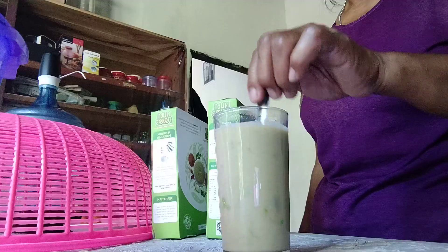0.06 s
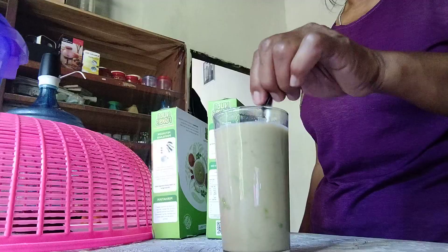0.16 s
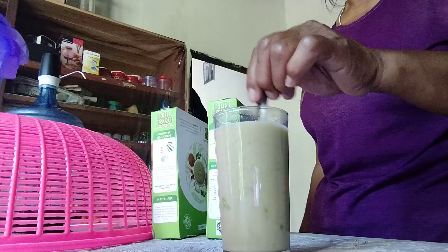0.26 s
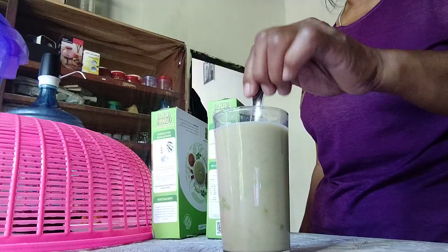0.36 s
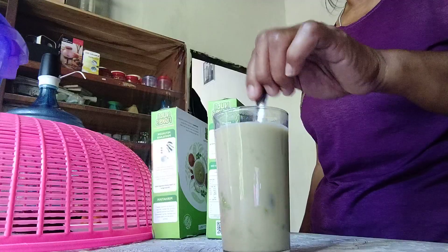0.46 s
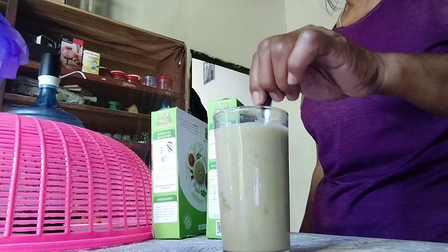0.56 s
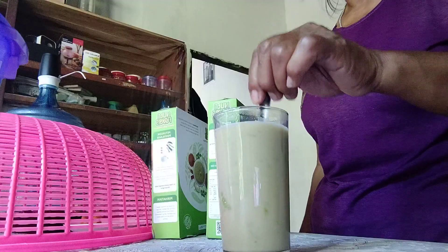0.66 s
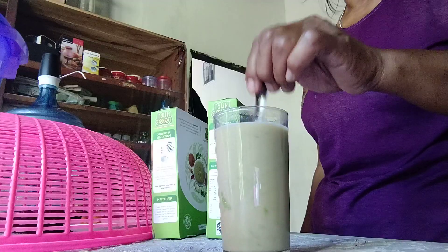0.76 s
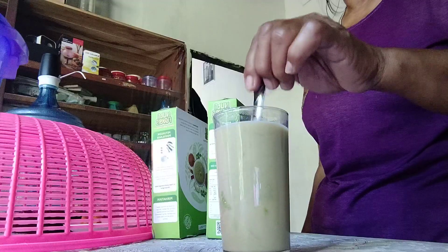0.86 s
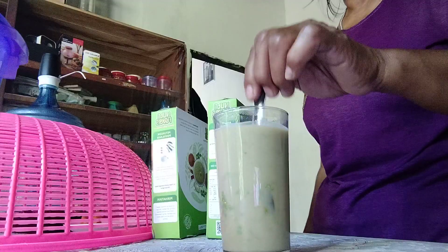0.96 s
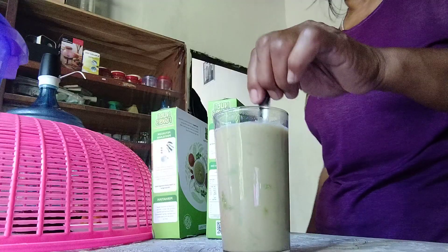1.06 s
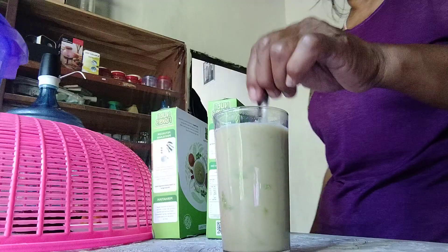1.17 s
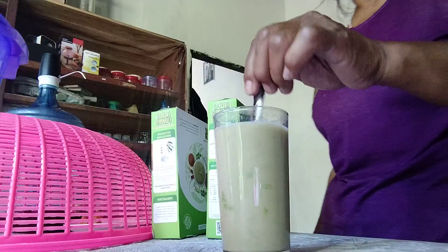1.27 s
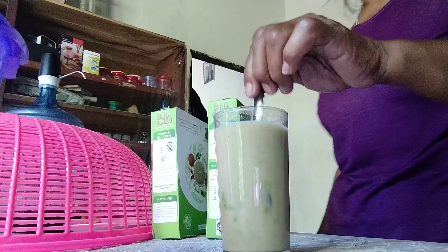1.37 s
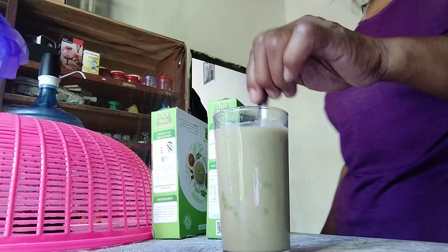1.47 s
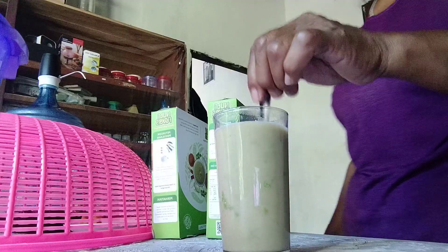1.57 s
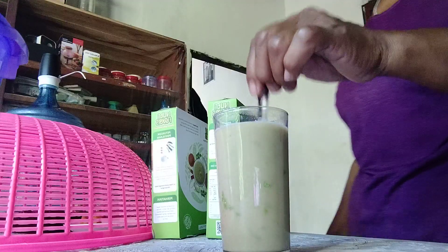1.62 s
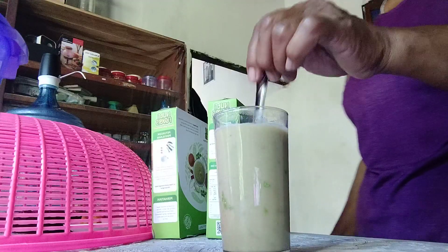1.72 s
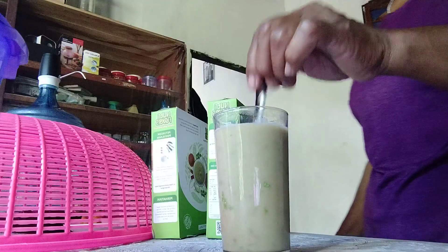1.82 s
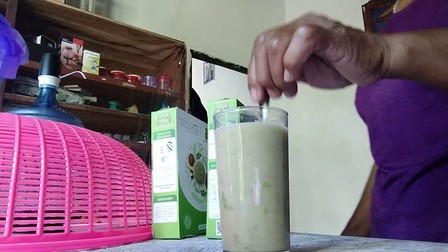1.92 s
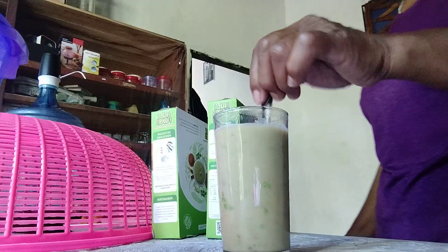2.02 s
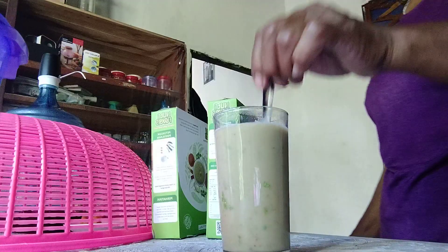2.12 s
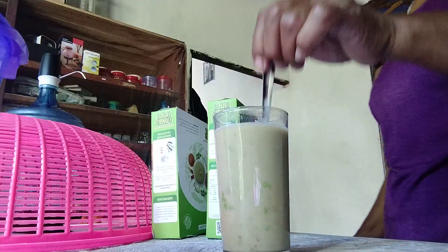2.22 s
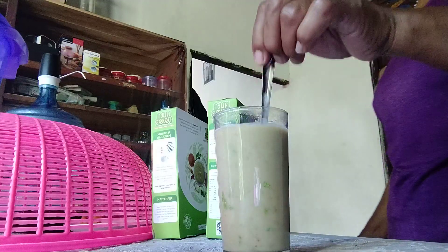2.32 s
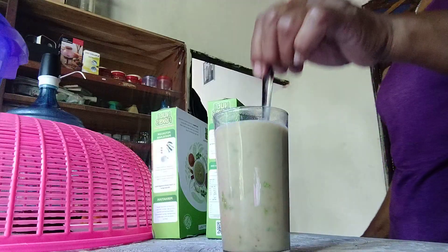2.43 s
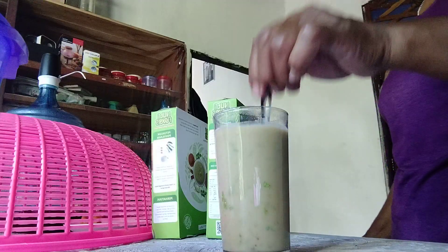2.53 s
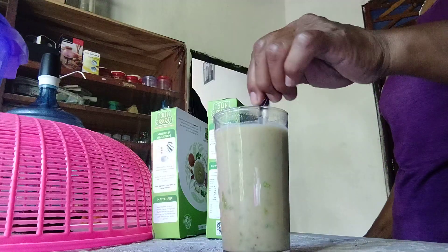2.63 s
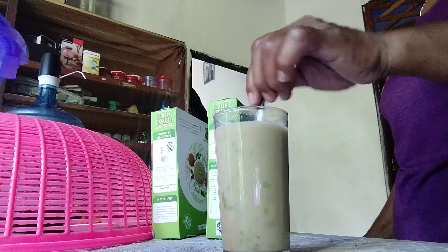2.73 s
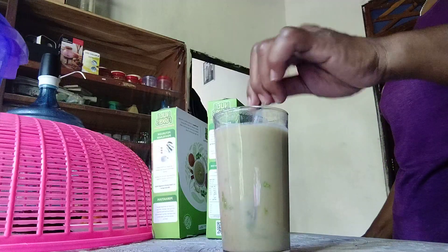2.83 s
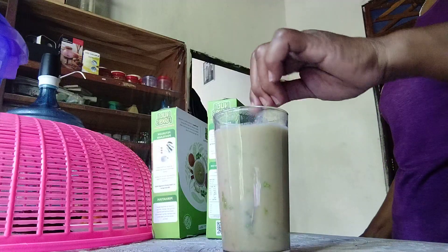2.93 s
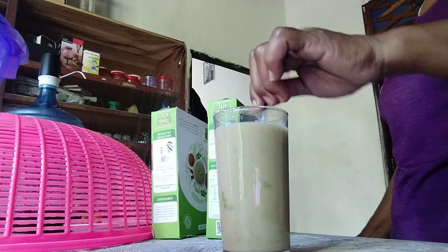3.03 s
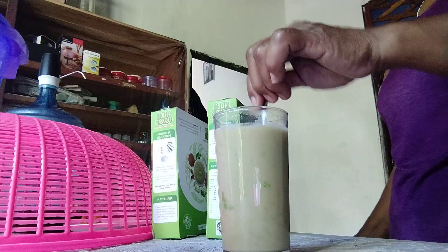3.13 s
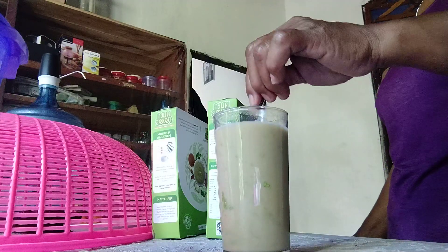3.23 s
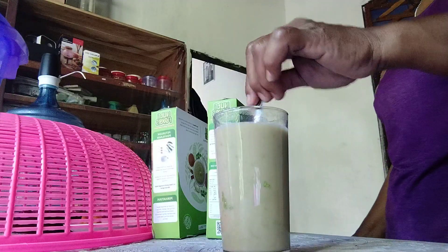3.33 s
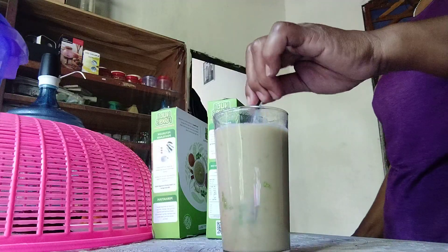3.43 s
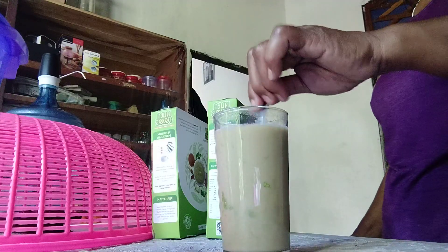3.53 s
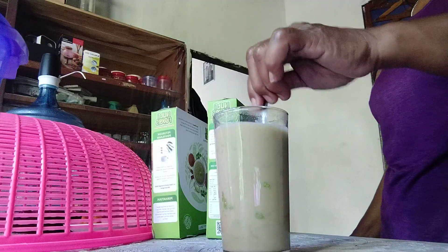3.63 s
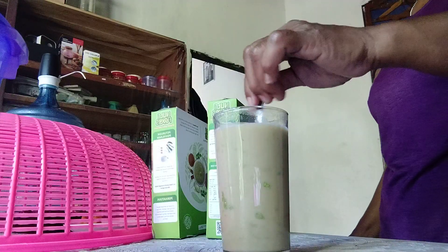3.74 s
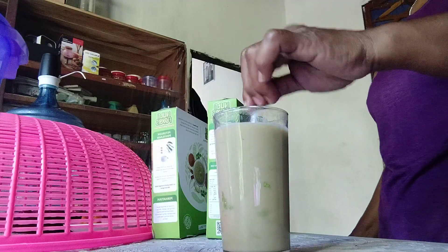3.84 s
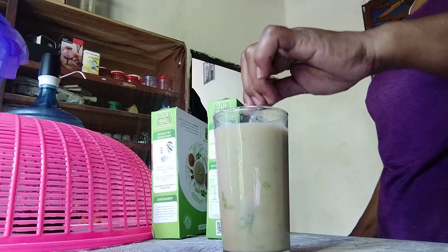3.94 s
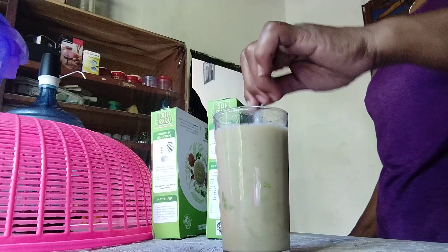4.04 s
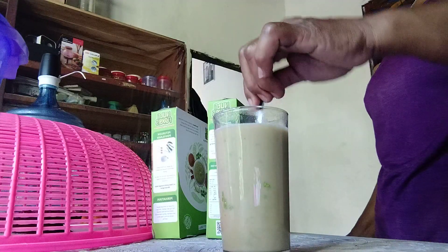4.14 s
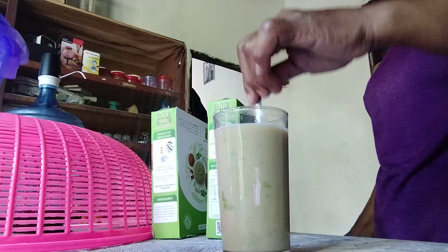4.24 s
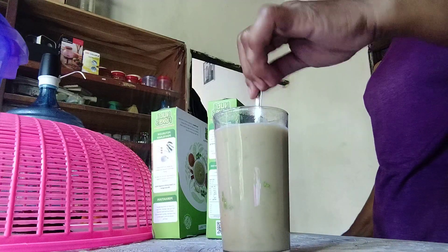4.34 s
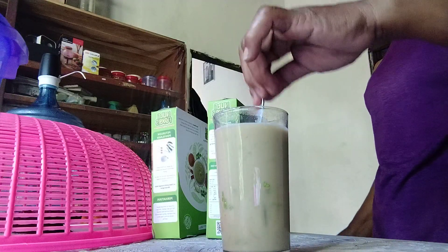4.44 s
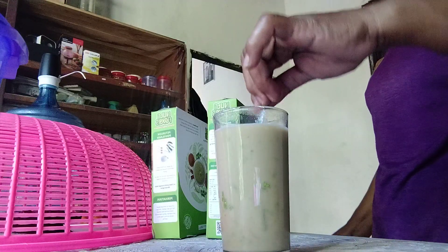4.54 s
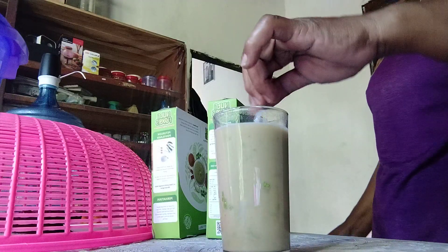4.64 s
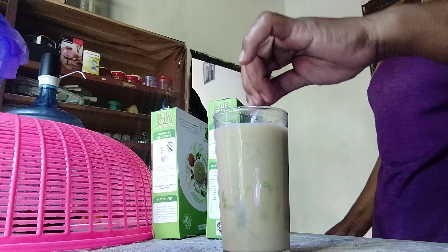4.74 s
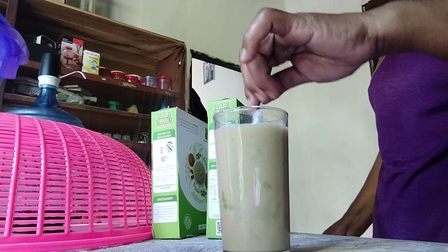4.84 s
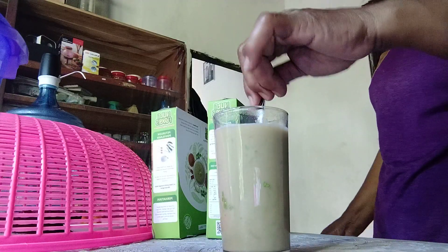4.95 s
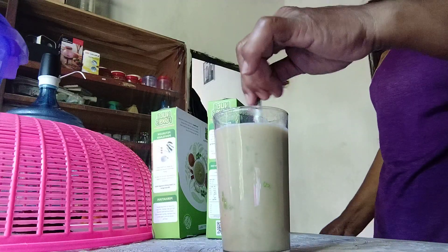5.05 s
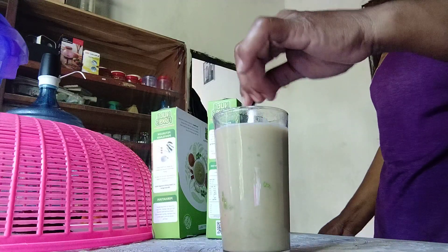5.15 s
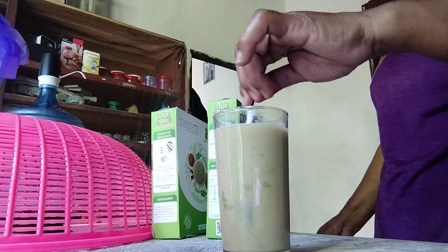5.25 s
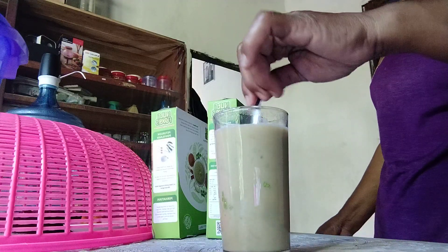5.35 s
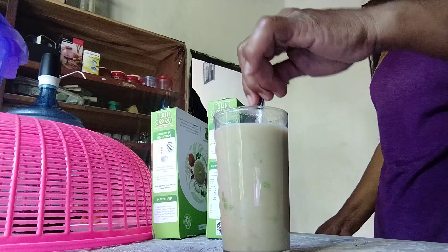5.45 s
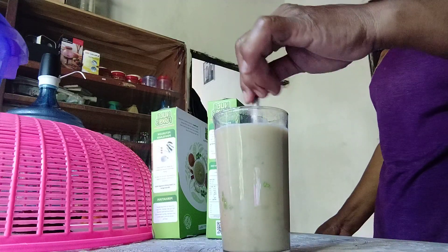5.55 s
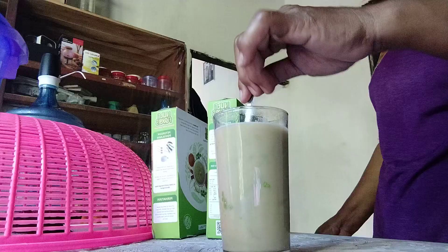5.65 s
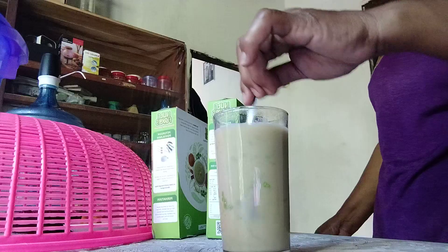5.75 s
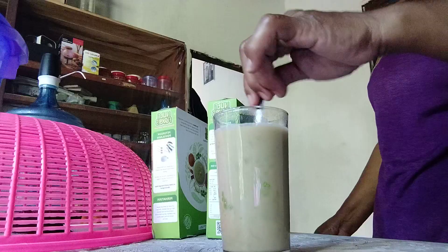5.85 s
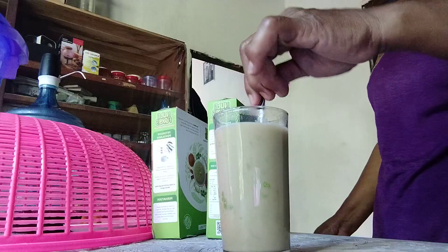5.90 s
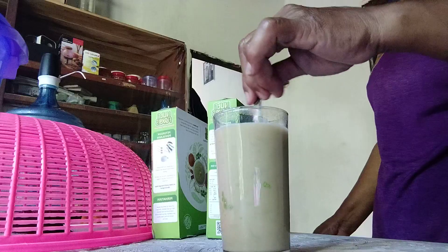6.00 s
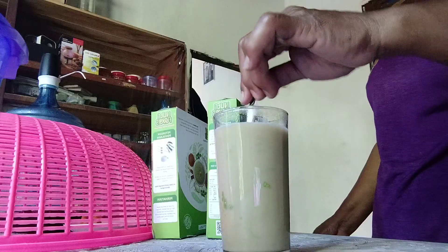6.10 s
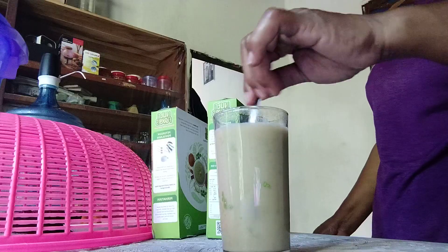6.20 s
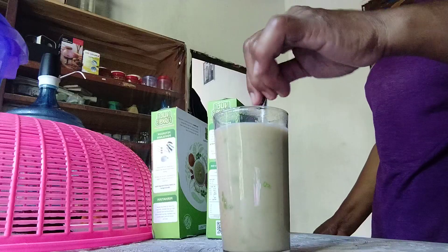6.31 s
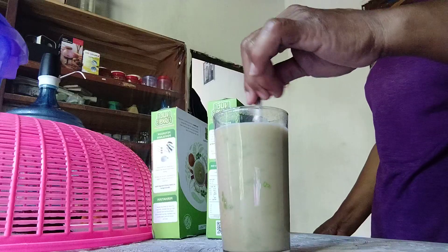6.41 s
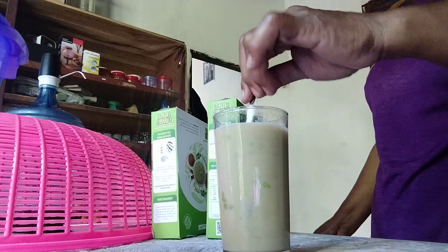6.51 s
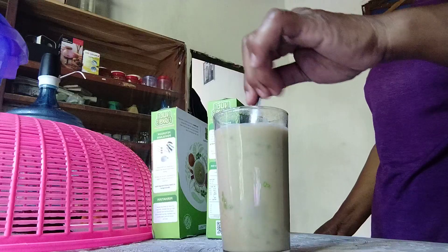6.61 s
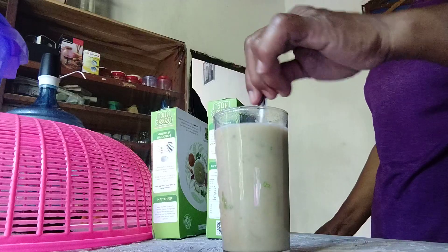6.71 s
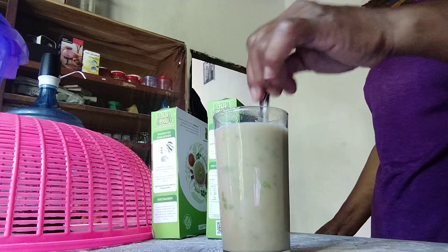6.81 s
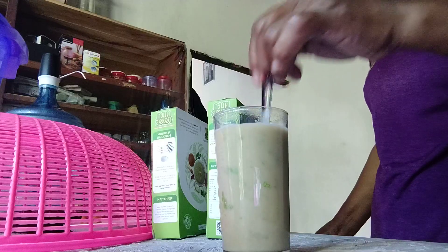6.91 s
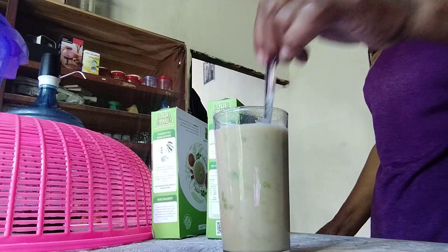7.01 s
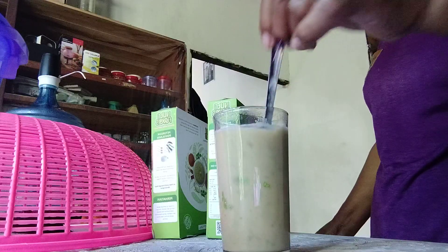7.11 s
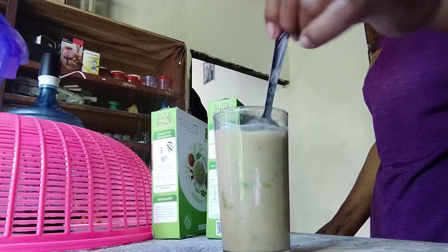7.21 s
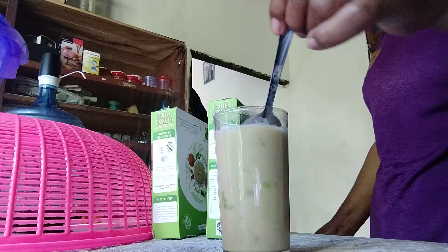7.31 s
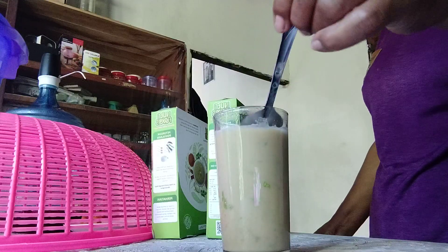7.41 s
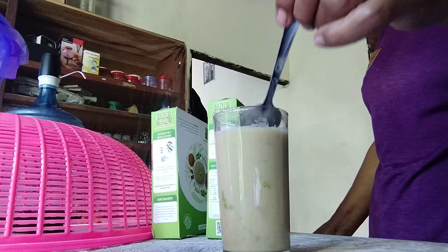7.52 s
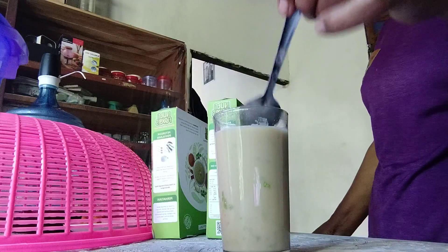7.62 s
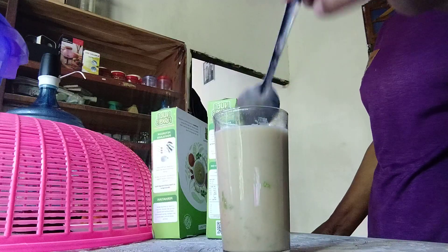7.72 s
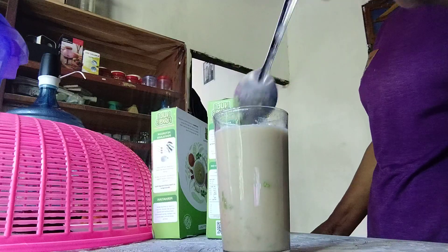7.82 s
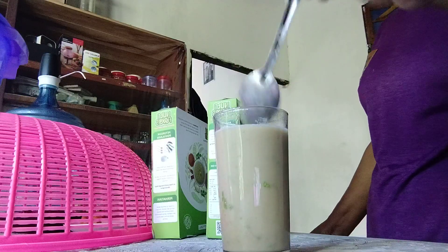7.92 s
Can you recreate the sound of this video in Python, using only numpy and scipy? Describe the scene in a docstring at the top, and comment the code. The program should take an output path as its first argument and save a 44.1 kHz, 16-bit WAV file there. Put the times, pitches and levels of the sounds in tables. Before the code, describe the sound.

In a small, reflective room with a very faint appliance hum, a spoon knocks around inside a full glass. The liquid damps it, so each contact is a dry clack rather than a ringing chime, with a soft low table thud. Wet swirls, deep glugs and tiny bubble plops fill between. The stirring runs steadily with brief pauses, then stops; light scrapes and ticks on the rim follow. Close phone microphone, mono.

```python
"""At a table in a small hard room, a steel spoon stirs a thick drink in a tall, full glass close to the phone.
The liquid damps the glass: each contact excites five registers of short resonances, heard as a clack.
Bubbles swirl and glug behind the spoon, the table top thuds, and a faint appliance hum lies underneath.
The handle taps the rim now and then; at the end the spoon is drawn out, scraping the rim, and drips off.
Shaped noise tails give the room's answer to every sound but the hum and air."""
import sys
import numpy as np
from scipy import signal
from scipy.fft import rfft, irfft, next_fast_len
from scipy.io import wavfile
from scipy.ndimage import uniform_filter1d, map_coordinates

SR = 44100
rng = np.random.default_rng(int(sys.argv[2]) if len(sys.argv) > 2 else 0)


def bounce(signal):
    """Save signal as a 16-bit WAV file at the path given by the first command-line argument."""
    frames = np.transpose(np.atleast_2d(signal))
    limited = np.clip(frames, -1, 1)
    pcm = np.round(limited * 32767).astype(np.int16)
    wavfile.write(sys.argv[1], SR, pcm)


N = 351477

# spoon meets glass: t/s, strength/dB, depth (0 upper wall to 1 base),
# edge (0 flat of the bowl to 1 its bare edge), wall pitch f/Hz
CONTACTS = [(-0.06, -46.5, 0.98, 0.67, 1400), (0.0259, -48.5, 0.55, 0.9, 1330),
            (0.1455, -41.0, 0.24, 0.56, 1060), (0.2399, -42.5, 0.84, 0.45, 1250),
            (0.3734, -41.5, 0.62, 0.58, 1470), (0.4422, -46.5, 0.48, 0.89, 1130),
            (0.572, -42, 0.32, 0.66, 996), (0.6908, -42.5, 0.84, 0.47, 1210),
            (0.8094, -42.5, 0.68, 0.45, 1515), (0.9224, -50, 0.36, 0.81, 1270),
            (1.1528, -46, 0.96, 0.37, 1390), (1.3111, -38.5, 0.72, 0.43, 1440),
            (1.3725, -57, 0.87, 0.93, 1320), (1.5071, -40, 0.44, 0.57, 1207),
            (1.6402, -47.0, 0.86, 0.46, 1304), (1.7182, -39.0, 0.66, 0.49, 1410),
            (1.8691, -61.5, 0.51, 0.88, 1250), (2.0696, -33.5, 0.24, 0.5, 1040),
            (2.0825, -43.5, 0.17, 0.64, 1180), (2.1006, -43, 0.72, 0.49, 1270),
            (2.1928, -37.5, 0.69, 0.37, 1560), (2.202, -49, 0.91, 0.81, 1400),
            (2.9323, -45.5, 0.15, 0.56, 1060), (2.98, -53.5, 0.77, 0.69, 975),
            (3.0132, -47.5, 0.74, 0.45, 1150), (3.308, -40.0, 0.72, 0.54, 1536),
            (3.562, -41.5, 0.57, 0.55, 1090), (3.571, -47, 0.33, 0.66, 1010),
            (3.6657, -41, 0.84, 0.52, 1310), (3.821, -42.5, 0.14, 0.8, 1180),
            (3.8246, -49, 0.96, 0.74, 1280), (3.9746, -46.5, 0.76, 0.29, 1400),
            (4.0494, -42.5, 0.73, 0.46, 1117), (4.3018, -54, 0.52, 0.021, 1494),
            (4.5358, -41.5, 0.085, 0.58, 1430), (4.6675, -39, 0.76, 0.44, 1080),
            (4.8306, -42.5, 0.77, 0.56, 1130), (4.9949, -44.0, 0.83, 0.48, 1025),
            (5.1119, -40.5, 0.77, 0.67, 1520), (5.1965, -52.5, 0.6, 0.91, 1210),
            (5.348, -40, 0.58, 0.57, 1340), (5.432, -48.5, 0.83, 0.16, 1014),
            (5.596, -43.5, 0.82, 0.67, 1540), (5.6637, -46.5, 0.49, 0.83, 1210),
            (5.815, -37, 0.47, 0.57, 1260), (5.9231, -42, 0.9, 0.48, 1075),
            (6.0617, -41.5, 0.72, 0.64, 1370), (6.119, -50, 0.62, 0.89, 1220),
            (6.271, -37.5, 0.53, 0.58, 1160), (6.3664, -50, 0.67, 0.12, 1080),
            (6.5571, -52.5, 0.43, 0.89, 1230), (6.7013, -38.5, 0.49, 0.55, 1096),
            (6.7972, -42.5, 0.86, 0.41, 1170), (6.9587, -41, 0.72, 0.59, 1666),
            (7.1963, -52.5, 0.076, 0.63, 1267), (7.211, -53, 0.067, 0.5, 1320)]
# resonances of the full glass with the spoon against it: f/Hz, relative level/dB, T60/s
GLASS_MODES = [(385.2, -7, 0.13), (490, -2.5, 0.1), (699, 4.5, 0.031), (875.8, 0.5, 0.062),
               (1096, -1.5, 0.012), (1402, -2.5, 0.023), (1577, -4, 0.015), (2188, -1, 0.023),
               (2530, 8, 0.005), (2890, 3.5, 0.0087), (3760, 2.5, 0.0039), (4270, 0.5, 0.0032),
               (5310, -3.5, 0.0026), (6380, 1, 0.0098), (6830, -7.5, 0.019), (7210, -4, 0.0073),
               (8160, 0.5, 0.0028), (9690, 3.5, 0.0016), (13100, -8, 0.0046), (14270, -3.5, 0.0048)]
# borders between the five registers of the glass: f/Hz
REGISTER_EDGES = [250, 880, 1900, 3400, 9000, 16000]
# how a blow excites each register, low to high (knock, wall, clack, tick, sheen):
# level against strength/dB, added at the base/dB, added by the edge/dB, added per dB of extra strength
RESPONSE = [(-29.5, 35.5, 0, 0), (-0.5, 0.5, -1, 0), (-28, 5, 25, -0.27), (-48.5, -2, 54.5, 0),
            (-46.5, 1.5, 32.5, 0.47)]
# resonances of the spoon's handle: f/Hz, relative level/dB, T60/s
HANDLE_MODES = [(701, -14.5, 0.15), (1171, 0, 0.03), (1470, -8, 0.0088), (2372, 3.5, 0.041),
                (2580, 4.5, 0.028), (3250, -18, 0.014), (4030, -24, 0.02), (5060, -10.5, 0.026),
                (5700, -13, 0.0092), (6650, -10.5, 0.004)]
# resonances of the table top: f/Hz, relative level/dB, T60/s
BOARD_MODES = [(90.4, -5.0, 0.25), (129.6, 1.0, 0.15), (156.0, -4.5, 0.11)]
# colour of the swirling drink: f/Hz, relative level/dB
LIQUID_COLOUR = [(200, -33), (450, -14.5), (660, 2), (900, -3.5), (1400, -4), (1900, -14.5), (2250, -10),
                 (2950, -25.5), (3700, -46), (9000, -62)]
# steady appliance hum: f/Hz, rms level/dB
HUM_TONES = [(247.6, -82.5), (543.7, -88), (651.4, -94.5), (705.2, -97)]
# colour of the still air: f/Hz, relative level/dB per Hz
AIR_COLOUR = [(15, -49.5), (25, -24.5), (166, -8), (249, -11), (373, -13.5), (545, -4.5), (1040, -24.5),
              (1480, -12), (2410, -34.5), (16000, -35)]
# decay of the room: f/Hz, T60/s
ROOM_DECAY = [(100, 0.63), (500, 0.39), (1400, 0.47), (3000, 0.44), (6500, 0.43), (14000, 0.4)]
# colour of the room's answer: f/Hz, level/dB
ROOM_COLOUR = [(100, 2), (280, -6.5), (500, 0.5), (1300, -3), (3000, -8.5), (6500, -5.5), (9500, -5),
               (14000, -6.5)]
# standing waves between the walls: f/Hz, level/dB
STANDING_WAVES = [(247, 1), (545, 3), (710, -0.5), (820, 8.5), (1335, 5)]
# the handle taps the rim: t/s, level/dB, brightness/dB per octave
RIM_TAPS = [(2.646, -47, -2.5), (7.083, -54, -6), (7.274, -49.5, 15), (7.308, -55.5, 15), (7.323, -53, 7),
            (7.549, -56, -1.5), (7.563, -52.5, 3), (7.623, -61.5, -1.5), (7.649, -51, -1)]
# the spoon slides along the glass, dull under the drink and bright on the rim:
# start t/s, length/s, level/dB, treble tilt/dB per octave, top f/Hz
SLIDES = [(4.242, 0.13, -75.5, 0, 3000), (7.247, 0.17, -63.5, 3, 6560), (7.529, 0.25, -67, -1, 6200)]
# single bubbles that stand out: t/s, level/dB, starting f/Hz
BUBBLES = [(1.928, -58.5, 669), (3.17, -66, 1520), (3.249, -64, 1655), (4.215, -48.5, 1317),
           (4.298, -49, 658), (4.335, -55.5, 1352), (4.40, -57, 645), (4.475, -61, 680), (7.39, -60, 487),
           (7.563, -51, 674)]
# wide sweeps of the spoon through the drink, each with a glug and a wake: t/s
SWEEPS = [0.582, 1.514, 2.98, 3.577, 4.056, 4.838, 5.37, 5.826, 6.286, 6.713]

TOP_HZ = 15650  # upper band limit
USUAL_DB = -43  # strength of an ordinary blow
PIVOT_HZ = 2400  # where the brightness tilts of taps and slides turn
GLUG_DB, GLUG_HZ, GLUG_SPREAD = -41.5, 182.2, 0.11  # level, central starting pitch, its share of chance
WAKE_DB, WAKE_PEAK_S = -69.5, 0.098  # swirl behind a sweep, and the time it takes to build
STIR_DB, SETTLE_S = -25, 0.11  # swirl against a blow's strength, and the time it takes to settle
LIFT_S, DRAIN_DB, DRAIN_S = 7.58, -80, 0.41  # the bowl leaves the drink, which runs off it


def amp(db):
    """Decibels to gain."""
    return 10 ** (np.asarray(db) / 20)


def unit(x):
    """Level x to rms 1."""
    return x / np.sqrt(np.mean(x ** 2) + 1e-30)


def along(points, hz):
    """Read a curve of (Hz, value) points on a log frequency axis."""
    f, v = np.transpose(points)
    return np.interp(np.log(hz + 1), np.log(f + 1), v)


def filtered(x, gain):
    """Shape x by a gain that depends on frequency."""
    m = next_fast_len(len(x) + 4096)
    return irfft(rfft(x, m) * gain(np.fft.rfftfreq(m, 1 / SR)), m)[:len(x)]


def add(track, s, sound):
    """Mix a sound into the track at time s, trimmed to fit."""
    i = int(round(s * SR))
    part = sound[max(-i, 0):N - i]
    track[max(i, 0):][:len(part)] += part


def ring(modes, t, scatter_db):
    """Resonances decay exponentially, each at a fresh strength and sign."""
    hz, db, t60 = np.transpose(modes)[:, :, None]
    sign = rng.choice([-1, 1], hz.shape)
    size = sign * amp(db + scatter_db * rng.standard_normal(hz.shape))
    decay = np.exp(-np.log(1000) * t / t60)
    return np.sum(size * np.sin(2 * np.pi * hz * t) * decay, axis=0)


def background(air_db=-85, waver_rad=0.12):
    """A faint appliance hum, slightly unsteady in phase, lies in the soft noise of still air."""
    t = np.arange(N) / SR
    hum = np.zeros(N)
    for hz, db in HUM_TONES:
        drift = map_coordinates(rng.standard_normal(64), [t * 6])  # smooth, six fresh values a second
        hum += amp(db) * np.sqrt(2) * np.sin(2 * np.pi * hz * t + waver_rad * drift)
    air = filtered(rng.standard_normal(N), lambda hz: amp(along(AIR_COLOUR, hz)))
    return hum + amp(air_db) * unit(air)


def blows():
    """Turn contacts into (s, five register levels in dB, wall pitch Hz): the base knocks, the edge ticks."""
    level, by_depth, by_edge, by_force = np.transpose(RESPONSE)
    hits = []
    for s, db, depth, edge, pitch in CONTACTS:
        registers = db + level + by_depth * depth + by_edge * edge + by_force * (db - USUAL_DB)
        hits.append((s, *registers, pitch))
    return hits


def chatter(t, spread_s, rebound=0.6, grit=0.033, grit_life_s=0.0028, count=3):
    """Contact force is a first touch, a few tiny rebounds and a gritty slide."""
    force = grit * rng.standard_normal(len(t)) * np.exp(-t / grit_life_s)
    force[0] += 1
    lags = (rng.uniform(size=count) * spread_s * SR).astype(int)
    return force + np.bincount(lags, rebound * rng.uniform(size=count), len(t))


def clinks(hits, wall_db=1, focus=0.39, wall_t60_s=0.023, crack_db=-8,
           touch_s=0.0024, edge_db=-9, edge_share=0.28):
    """Where and how hard the spoon lands sets the strength of each register of the glass."""
    track, t = np.zeros(N), np.arange(SR // 16) / SR
    blow = int(0.014 * SR)  # the opening that sets each register's level
    registers = list(zip(REGISTER_EDGES, REGISTER_EDGES[1:]))
    bands = [signal.butter(3, [lo, min(hi, TOP_HZ)], "band", fs=SR, output="sos") for lo, hi in registers]
    for s, knock, wall, clack, tick, sheen, pitch in hits:
        # bright ticks come from the spoon's edge, which touches more briefly
        touch = touch_s * (edge_share if tick - wall > edge_db else 1)
        force = chatter(t, touch)
        # the wall's main note shifts with the place of the blow and stands out when the base is not knocked
        main_db = wall_db + focus * np.clip(wall - knock, 0, 12)
        modes = list(GLASS_MODES) + [(pitch, main_db, wall_t60_s)]
        clink = np.zeros(len(t))
        for (lo, hi), band, db in zip(registers, bands, (knock, wall, clack, tick, sheen)):
            in_register = [m for m in modes if lo <= m[0] < hi]
            tone = signal.fftconvolve(force, ring(in_register, t, scatter_db=4))[:len(t)]
            crack = rng.standard_normal(len(t)) * np.exp(-t / touch)
            part = unit(signal.sosfilt(band, tone))
            part += amp(crack_db) * unit(signal.sosfilt(band, crack))
            clink += amp(db) * part / np.std(part[:blow])
        add(track, s, hit_in_room(clink))
    return track


def room_tail(colour=np.ones_like, first_wall_s=0.0025):
    """A diffuse noise tail builds up as the walls answer, then dies at a rate set by frequency."""
    hz, t, z = signal.stft(rng.standard_normal(SR * 5 // 8), SR, nperseg=512)
    t60 = along(ROOM_DECAY, hz)[:, None]
    # the root keeps a long decay from carrying more energy than a short one
    fade = np.exp(-np.log(1000) * t / t60) * np.sqrt(2 * np.log(1000) / (t60 * SR))
    tint = (colour(hz) * amp(along(ROOM_COLOUR, hz)))[:, None]
    tail = signal.istft(z * fade * tint, SR, nperseg=512)[1]
    age = np.arange(len(tail)) / SR
    return tail * (1 - np.exp(-(age / first_wall_s) ** 2))


def hit_in_room(hit, blur_hz=150, width_hz=20, room_db=-1):
    """A hit radiates every way, so the room answers with its broad colour and the room's standing waves."""
    power = np.abs(rfft(hit, SR)) ** 2  # one bin per Hz
    broad = np.sqrt(np.abs(uniform_filter1d(power, int(blur_hz))))

    def standing(f):
        """Each standing wave is a narrow resonance over a flat response."""
        return 1 + sum((amp(db) - 1) / (1 + 2j * (f - hz) / width_hz) for hz, db in STANDING_WAVES)

    tail = amp(room_db) * filtered(room_tail(lambda hz: broad[hz.astype(int)]), standing)
    return tail + np.pad(hit, (0, len(tail) - len(hit)))


def in_room(x):
    """A running sound is heard with the room's answer."""
    return x + signal.fftconvolve(x, room_tail())[:N]


def table(hits, knock_db=-17, rise_s=0.0013):
    """The table top takes a little of every knock and rings low."""
    track, t = np.zeros(N), np.arange(SR // 4) / SR
    for s, db, *_ in hits:
        thud = (1 - np.exp(-t / rise_s)) * ring(BOARD_MODES, t, scatter_db=0.5)
        add(track, s, amp(db + knock_db) * thud)
    return in_room(track)


def agitation():
    """Blows stir the drink, sweeps leave a wake, and it drains off the lifted spoon; their powers add."""
    t = np.arange(N) / SR
    power = np.zeros(N)
    wake = amp(WAKE_DB) * t[:SR] / WAKE_PEAK_S * np.exp(1 - t[:SR] / WAKE_PEAK_S)
    settling = amp(STIR_DB) * np.exp(-t[:SR] / SETTLE_S)
    for s, db, *_ in CONTACTS:
        add(power, s, (amp(db) * settling) ** 2)
    for s in SWEEPS:
        add(power, s, wake ** 2)
    add(power, LIFT_S, (amp(DRAIN_DB) * np.exp(-t / DRAIN_S)) ** 2)
    return np.sqrt(power)


def swirl(cycles=9, glide=0.18, wash_db=-5, count=420):
    """Small bubbles rise in pitch as they die, over the soft noise wash of the drink."""
    bubbles, t = np.zeros(N), np.arange(SR // 16) / SR
    for when, note, size in rng.uniform(size=(count, 3)):
        hz = 520 * 3.5 ** note
        age = t * hz / cycles
        pop = np.sin(2 * np.pi * hz * t * (1 + glide * t / t[-1])) * np.exp(-age) * (1 - np.exp(-6 * age))
        add(bubbles, when * N / SR, amp(10 * size) * pop)
    colour = lambda hz: amp(along(LIQUID_COLOUR, hz))
    water = filtered(unit(bubbles), colour)
    wash = filtered(rng.standard_normal(N), colour)
    return in_room(agitation() * (unit(water) + amp(wash_db) * unit(wash)))


def bubble(db, hz, t60, glide, soft_cycles=1.5):
    """A pocket of air rings with a soft start while its pitch glides."""
    t = np.arange(SR // 3) / SR
    phase = 2 * np.pi * hz * np.cumsum(1 + glide * np.minimum(t / t60, 1)) / SR
    decay = np.exp(-np.log(1000) * t / t60)
    return amp(db) * np.sin(phase) * decay * (1 - np.exp(-t * hz / soft_cycles))


def glugs(glug_t60_s=0.065, glug_glide=-0.23, bubble_t60_s=0.09, bubble_glide=0.029):
    """Deep glugs sink in pitch as the hollow behind the spoon opens; single bubbles rise."""
    track = np.zeros(N)
    for s in SWEEPS:
        hz = GLUG_HZ * (1 + GLUG_SPREAD * rng.standard_normal())
        add(track, s, bubble(GLUG_DB, hz, glug_t60_s, glug_glide))
    for s, db, hz in BUBBLES:
        add(track, s, bubble(db, hz, bubble_t60_s, bubble_glide))
    return in_room(track)


def taps(tap_db=2, touch_s=0.005):
    """The handle chatters briefly on the rim and rings, brighter or duller each time."""
    track, t = np.zeros(N), np.arange(SR // 16) / SR
    for s, db, tilt in RIM_TAPS:
        modes = [(hz, level + tilt * np.log2(hz / PIVOT_HZ), t60) for hz, level, t60 in HANDLE_MODES]
        tap = signal.fftconvolve(chatter(t, touch_s), ring(modes, t, scatter_db=4.5))[:len(t)]
        add(track, s, hit_in_room(amp(db + tap_db) * tap / np.abs(tap).max()))
    return track


def slides(slips_per_s=800):
    """Uneven slips ring the handle; in each slide the spoon leans on the glass and lets go again."""
    t = np.arange(N) / SR
    slips = (rng.uniform(size=N) < slips_per_s / SR) * rng.standard_normal(N)
    steel = signal.fftconvolve(slips, ring(HANDLE_MODES, t[:SR // 16], scatter_db=6))[:N]
    track = np.zeros(N)
    for s, length, db, tilt_db, top_hz in SLIDES:
        muffle = signal.butter(8, min(top_hz, TOP_HZ), fs=SR, output="sos")
        tilt = lambda hz: amp(tilt_db * np.log2(np.maximum(hz / PIVOT_HZ, 1)))
        rub = filtered(signal.sosfilt(muffle, steel), tilt)
        swell = np.sin(np.pi * np.clip((t - s) / length, 0, 1))
        track += amp(db) * swell * unit(rub)
    return in_room(track)


def scrape(grip_hz=7000):
    """Taps and slides are light touches, so they carry little high treble."""
    soft = signal.butter(4, grip_hz, fs=SR, output="sos")
    return signal.sosfilt(soft, taps() + slides())


def scene():
    """Everything meets at one microphone."""
    hits = blows()
    return (background() + clinks(hits) + table(hits) + swirl() + glugs() + scrape())[None]


def record(dry, low_cut_hz=62):
    """The phone thins the deep bass and keeps nothing above its band limit."""
    thinned = signal.sosfilt(signal.butter(2, low_cut_hz, "high", fs=SR, output="sos"), dry)
    return np.array([filtered(x, lambda hz: hz < TOP_HZ) for x in thinned])


dry = scene()
out = record(dry)
bounce(out)
```